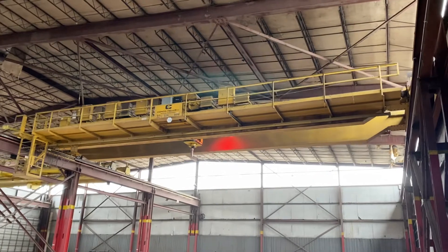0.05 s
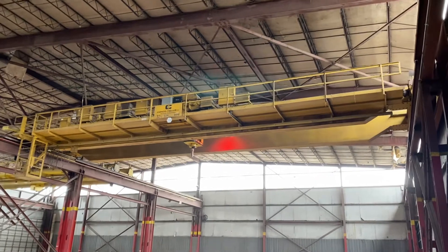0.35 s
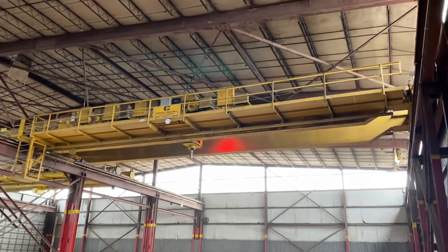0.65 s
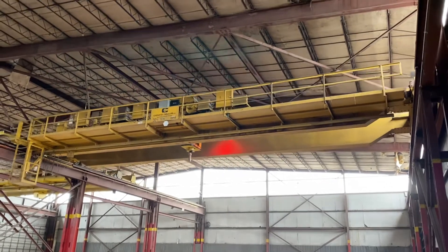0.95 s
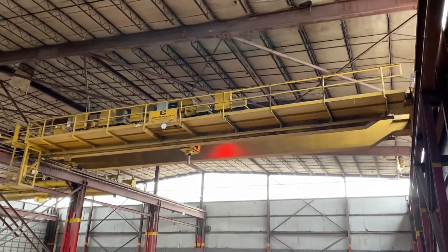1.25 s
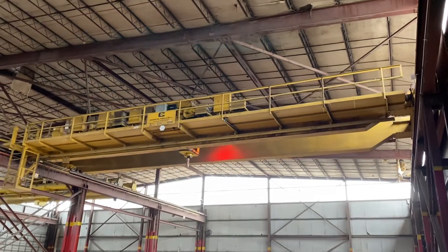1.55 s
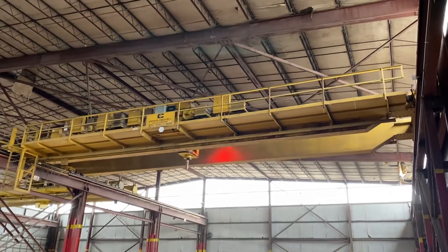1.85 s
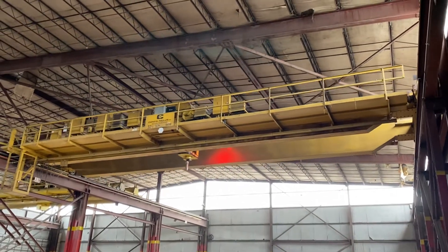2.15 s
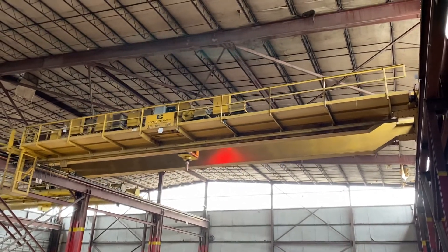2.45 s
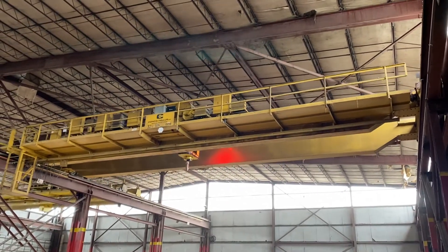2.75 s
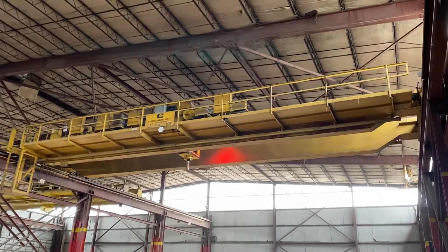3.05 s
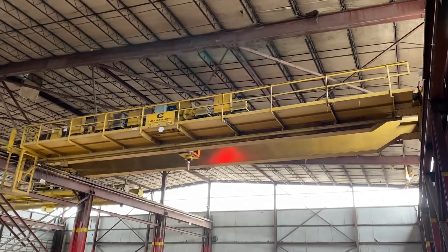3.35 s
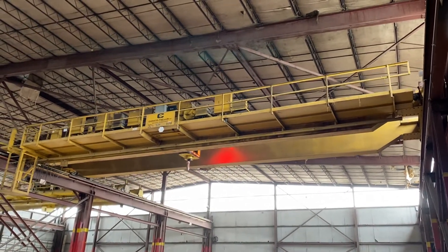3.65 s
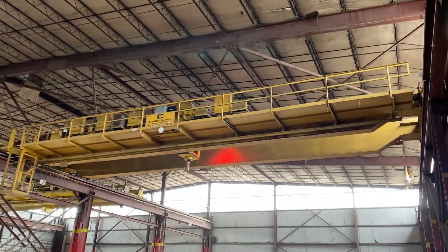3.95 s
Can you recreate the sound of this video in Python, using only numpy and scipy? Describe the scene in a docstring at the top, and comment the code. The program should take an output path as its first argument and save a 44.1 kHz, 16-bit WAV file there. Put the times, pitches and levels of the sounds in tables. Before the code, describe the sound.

An overhead crane rumbles along its rails in a large, echoing steel hall.

```python
"""An overhead crane rolls along its runway in a large steel hall. From the start the wheels rumble over
the building's drone, a wash of machinery and a hiss, and they keep the girders ringing at resonance.
Far clanks, blurred by reverberation, and small ticks come and go. The wheels rub, gears begin to whine,
then a flange sings faintly against the rail. From 3 s a motor hum swells and light metal chinks;
last comes a nearer clatter."""
import sys
import numpy as np
from scipy import signal
from scipy.fft import rfft, irfft
from scipy.io import wavfile
from scipy.ndimage import uniform_filter1d

SR = 44100
rng = np.random.default_rng(int(sys.argv[2]) if len(sys.argv) > 2 else 0)


def store_pcm(level_fs):
    """Save levels as 16-bit WAV."""
    pcm = np.round(np.clip(level_fs, -1, 1) * 32767).astype(np.int16)
    wavfile.write(sys.argv[1], SR, np.atleast_2d(pcm).T)


N = 176400
TIME = np.arange(N) / SR
FREQS = np.maximum(np.arange(N // 2 + 1) * SR / N, 1)
SIDES = np.array([[1], [-1]])  # left, right: a positive pan_db favours the left
DIRECT_SHARE = .23  # of the power of wash and girders, arriving straight from the left
# spectrum of a sharp metal contact: f/Hz, level/dB
CONTACT_SPECTRUM = [(800, -14), (2500, 7.5), (4200, -0.5), (6000, -1), (8000, -10.5), (11000, -5.5),
                    (14000, -15), (16000, 0.5)]


def from_db(db):
    """Amplitude ratio: tenfold per 20 dB."""
    return 10 ** (np.asarray(db) / 20)


def envelope(rows):
    """Amplitude over time from rows of t/s, level/dB."""
    return from_db(np.interp(TIME, *np.transpose(rows)))


def over_hz(points):
    """Interpolation along a logarithmic frequency axis."""
    hz, value = np.transpose(points)
    return np.interp(np.log(FREQS), np.log(hz), value)


def resonance(hz, width_hz):
    """Response of a resonance with steep skirts."""
    return 1 / (1 + 2 * ((FREQS - hz) / width_hz) ** 2)


def hall_noise(gain, direct=0, pan_db=0, lag_s=.00045):
    """Superposition of a diffuse field and direct sound that lags on the right; rms 1 before panning."""
    coherence = [(60, 0.96), (110, 1), (170, 0.88), (270, 0.83), (400, 0.45), (550, 0.16), (800, 0.38),
                 (1200, 0.013), (2000, 0), (3200, 0.58), (5000, 0.036), (15000, 0)]  # diffuse field: f/Hz, left-right correlation
    alike = over_hz(coherence)
    mid, side, straight = rfft(rng.standard_normal((3, N)))
    diffuse = np.sqrt((1 + alike) / 2) * mid + np.sqrt((1 - alike) / 2) * side * SIDES
    delay = np.exp(-2j * np.pi * FREQS * lag_s * np.array([[0], [1]]))
    x = irfft(gain * (np.sqrt(1 - direct) * diffuse + np.sqrt(direct) * straight * delay), N)
    return x / np.sqrt(np.mean(x ** 2)) * from_db(pan_db * SIDES / 2)


def evened(x, span_s):
    """Division by the running rms steadies a noise over spans longer than span_s."""
    power = uniform_filter1d(np.mean(x ** 2, axis=0), int(span_s * SR), mode="wrap")
    return x / np.sqrt(power + 1e-9)


def flutter(rate_hz):
    """Low-pass noise for random modulation; standard deviation 1."""
    x = irfft(rfft(rng.standard_normal(N)) / (1 + (FREQS / rate_hz) ** 2), N)
    return x / x.std()


def blows(rows, spectrum, rise_s, grain_db, direct, pan_db):
    """Reverberation of impacts: dense reflections build up, add in power and decay exponentially."""
    power = 0
    for start, db, decay in rows:
        rise = np.clip((TIME - start) / rise_s, 0, 1)
        power += (rise * from_db(db - decay * np.maximum(TIME - start - rise_s, 0))) ** 2
    grain = from_db(grain_db * flutter(310))
    return np.sqrt(power) * grain * hall_noise(from_db(over_hz(spectrum)), direct, pan_db)


def singing(rows, tone_share, width_hz, pan_db):
    """Random modulation puts a fringe of sidebands round a gliding tone with tone_share of the power."""
    t, hz, db = np.transpose(rows)
    fringe = np.array([flutter(width_hz) + 1j * flutter(width_hz) for _ in SIDES]) / np.sqrt(2)
    phase = 2 * np.pi * np.cumsum(np.interp(TIME, t, hz)) / SR
    carrier = np.exp(1j * (phase + np.pi / 4 * SIDES))  # the sides are a quarter cycle apart
    tone = np.sqrt(2) * np.real((np.sqrt(tone_share) + np.sqrt(1 - tone_share) * fringe) * carrier)
    return tone * from_db(np.interp(TIME, t, db) + pan_db * SIDES / 2)


def wheel_rumble():
    """Rolling contact radiates low-frequency noise."""
    levels = [(0, -25), (.25, -27.5), (1.0, -28.5), (1.55, -29), (2.05, -32.5), (2.5, -32.5), (2.9, -31.5),
              (3.2, -35), (3.55, -30.5), (3.9, -31.5)]  # t/s, level/dB
    spectrum = [(18, -47), (32, -12), (44, -8), (56, -13), (80, -0.5), (102, -3.5), (116, 0), (133, 4),
                (160, -3.5), (190, -5.5), (220, -3.5), (243, -1.5), (290, -6.5), (330, -11.5), (450, -22.5),
                (700, -31), (1500, -90)]  # f/Hz, level/dB
    return envelope(levels) * evened(hall_noise(from_db(over_hz(spectrum))), span_s=.15)


def building_drone():
    """The building drones in a deep, continuous band of noise."""
    levels = [(0, -35), (.7, -40.5), (1.35, -36), (1.85, -37.5), (2.2, -39.5), (3.0, -42), (3.9, -41)]  # t/s, level/dB
    spectrum = [(18, -28), (24, -14), (30, 18), (39, 8), (51, 25), (60, 24), (80, 14), (140, -47.5)]  # f/Hz, level/dB
    return envelope(levels) * evened(hall_noise(from_db(over_hz(spectrum)), pan_db=1.5), span_s=.23)


def machinery_wash():
    """Countless narrow resonances of roof and walls filter the machinery noise, differently per side."""
    levels = [(0, -35.5), (.45, -35), (1.0, -36), (1.55, -35), (2.1, -36.5), (2.7, -36), (3.2, -36.5),
              (3.5, -35), (3.9, -35.5)]  # t/s, level/dB
    spectrum = [(150, -45), (350, 1.5), (480, 0), (600, 3), (690, -5), (790, -2.5), (960, -3.5),
                (1230, -3.5), (1350, -5.5), (1700, -4), (2050, -10.5), (2800, -12.5), (3250, -19),
                (4300, -23), (4900, -23.5), (5500, -24.5), (7000, -33), (8000, -34), (9000, -64),
                (12000, -71)]  # f/Hz, level/dB
    depth_db, spacing_hz = 5, 15
    patterns = rng.standard_normal((2, 4000))
    ripple = np.array([np.interp(FREQS / spacing_hz, np.arange(len(row)), row) for row in patterns])
    ripple_db = depth_db * ripple * FREQS / (FREQS + 1000)  # mainly above the low mids
    noise = hall_noise(from_db(over_hz(spectrum) + ripple_db), DIRECT_SHARE, pan_db=-.1)
    return envelope(levels) * noise * from_db(.87 * flutter(40))


def girder_ring():
    """Forced vibration: the wheels keep the girders' modes ringing."""
    modes = [(590, 70, -60), (854.5, 30, -46.5), (1176, 52, -50), (1620, 110, -70), (4790, 140, -68)]  # f/Hz, width/Hz, level/dB
    return sum(from_db(db) * hall_noise(resonance(hz, width), DIRECT_SHARE, pan_db=-2)
               for hz, width, db in modes)


def high_hiss():
    """A mostly direct hiss, placed to the right by its arrival-time difference."""
    levels = [(0, -60.5), (.5, -60.5), (1.4, -63), (2.1, -66), (2.7, -65), (3.2, -67), (3.9, -68)]  # t/s, level/dB
    spectrum = [(4000, -25), (6500, -5), (8000, -2), (10000, 0), (11000, -1), (12200, -4), (13800, -3),
                (16000, -11)]  # f/Hz, level/dB
    noise = hall_noise(from_db(over_hz(spectrum)), direct=.95, lag_s=-.00029)
    return envelope(levels) * noise * from_db(.71 * flutter(12))


def far_clanks():
    """Distant impacts arrive mostly as reverberant sound."""
    hits = [(.004, -40, 80), (.243, -37.8, 210), (.400, -42, 85), (1.312, -44.3, 125), (1.472, -39.8, 140),
            (1.55, -46.5, 80), (2.6, -53, 50)]  # t/s, level/dB, decay/(dB/s)
    spectrum = [(300, -3), (600, 1), (900, 0), (2200, 1.5), (2900, -1), (3800, 1), (5000, -2.5),
                (7000, -10), (10000, -21), (16000, -32)]  # f/Hz, level/dB
    return blows(hits, spectrum, rise_s=.013, grain_db=-.5, direct=.18, pan_db=0)


def metal_ticks():
    """Brief contacts of loose metal give broadband transients."""
    hits = [(.252, -56, 500), (.419, -48, 1202), (.430, -48, 602)]  # t/s, level/dB, decay/(dB/s)
    return blows(hits, CONTACT_SPECTRUM, rise_s=.002, grain_db=1.2, direct=.3, pan_db=-1)


def wheel_rubs():
    """Friction at the wheels excites narrow noise bands that swell and fade."""
    rubs = [(.55, .4, 1200, 55, -47), (1.76, .08, 865, 60, -46), (2.85, .3, 597, 20, -50),
            (2.8, .18, 1222, 16, -50), (3.28, .08, 1155, 22, -47), (3.68, .15, 1157, 16, -43.5),
            (3.59, .14, 1110, 55, -42), (2.68, .1, 6600, 450, -61)]  # peak t/s, half length/s, f/Hz, width/Hz, level/dB
    out = 0
    for peak, half, hz, width, db in rubs:
        swell = from_db(db) * np.exp(-.5 * ((TIME - peak) / half) ** 2)
        out += swell * evened(hall_noise(resonance(hz, width), pan_db=-9), span_s=.12)
    return out


def gear_whine():
    """Meshing gears radiate a slightly wandering tone, strongest around 3 s."""
    course = [(1.5, 850, -64), (1.95, 850, -50), (2.1, 848, -57), (2.3, 846, -49.5), (2.43, 850, -55),
              (2.55, 857, -48), (2.8, 838, -44.5), (3.02, 849, -40.5), (3.26, 848, -44.5), (3.38, 850, -62),
              (3.9, 850, -72)]  # t/s, f/Hz, level/dB
    return singing(course, tone_share=.8, width_hz=13, pan_db=-1.5)


def flange_squeal():
    """Friction against the rail sustains a tone in a wheel flange."""
    course = [(2.3, 1195, -66), (3.0, 1188, -51), (3.22, 1182, -44.5), (3.42, 1178, -47), (3.58, 1183, -43),
              (3.78, 1180, -43), (3.92, 1194, -45.5)]  # t/s, f/Hz, level/dB
    return singing(course, tone_share=.62, width_hz=20, pan_db=-6)


def motor_hum():
    """Partials near mains harmonics rise in turn and beat with narrow-band noise; most then fade."""
    partials = [(62, 3.02, -38, 0), (124, 3.43, -32.5, 16), (178, 3.32, -30.2, 33), (240, 3.37, -31, 9),
                (287, 3.4, -44, 0), (480, 3.35, -48.5, 6)]  # f/Hz, onset t/s, level/dB, decay/(dB/s)
    rise_s, waver, width_hz = .12, .33, 8
    out = 0
    for hz, start, db, decay in partials:
        tone = np.sqrt(2) * np.sin(2 * np.pi * (hz * TIME + rng.random()))
        fringe = waver * hall_noise(resonance(hz, width_hz))
        rise = np.clip((TIME - start) / rise_s, 0, 1)
        out += (tone + fringe) * rise * from_db(db - decay * np.maximum(TIME - start - rise_s, 0))
    return out


def bright_chink():
    """Light metal strikes and rebounds faintly; reflections smear both attacks."""
    hits = [(3.345, -38, 270), (3.385, -51.5, 170)]  # t/s, level/dB, decay/(dB/s)
    spectrum = [(500, 12.5), (1700, 9), (3000, -4), (5000, 5), (8000, -6), (11000, -2.5), (14000, -12),
                (16000, -11)]  # f/Hz, level/dB
    return blows(hits, spectrum, rise_s=.021, grain_db=3, direct=.13, pan_db=1)


def near_clatter():
    """A nearer impact: its low body is damped more slowly than its sharp contacts."""
    body_hit = [(3.948, -22, 70)]  # t/s, level/dB, decay/(dB/s)
    body_spectrum = [(80, -26), (160, -7), (210, 14), (265, 9), (350, 1.5), (430, 6), (560, -1.5),
                     (850, 0.5), (1300, -3.5), (2100, -7), (2900, -15), (3600, -17), (6000, -22),
                     (15000, -34)]  # f/Hz, level/dB
    contacts = [(3.956, -26, 420), (3.966, -28, 350), (3.988, -37, 152)]  # t/s, level/dB, decay/(dB/s)
    body = blows(body_hit, body_spectrum, rise_s=.005, grain_db=1.5, direct=.081, pan_db=1.5)
    return body + blows(contacts, CONTACT_SPECTRUM, rise_s=.0052, grain_db=-2.2, direct=.11, pan_db=.5)


def scene():
    """Linear superposition of all sources in the hall."""
    background = wheel_rumble() + building_drone() + machinery_wash() + girder_ring() + high_hiss()
    tones = wheel_rubs() + gear_whine() + flange_squeal() + motor_hum()
    impacts = far_clanks() + metal_ticks() + bright_chink() + near_clatter()
    return background + tones + impacts


def record(dry):
    """Soft saturation in the microphone rounds the peaks; a low-pass filter cuts the top."""
    ceiling, cutoff_hz = .3, 15500
    rounded = dry / (1 + (dry / ceiling) ** 8) ** (1 / 8)
    return signal.sosfilt(signal.ellip(10, .1, 80, cutoff_hz, fs=SR, output="sos"), rounded)


dry = scene()
out = record(dry)
store_pcm(out)
```